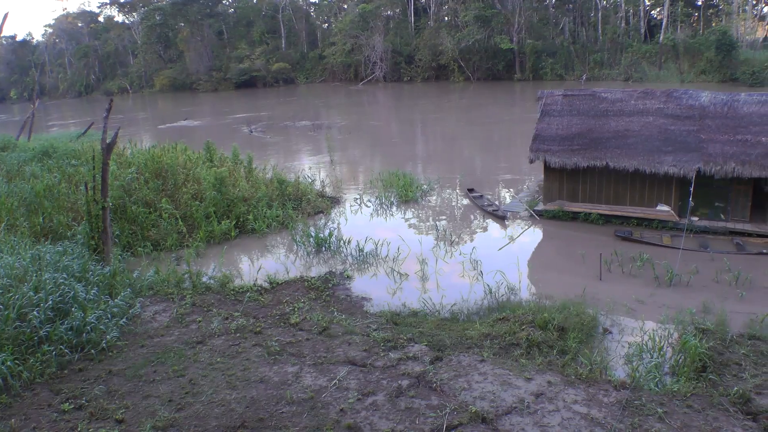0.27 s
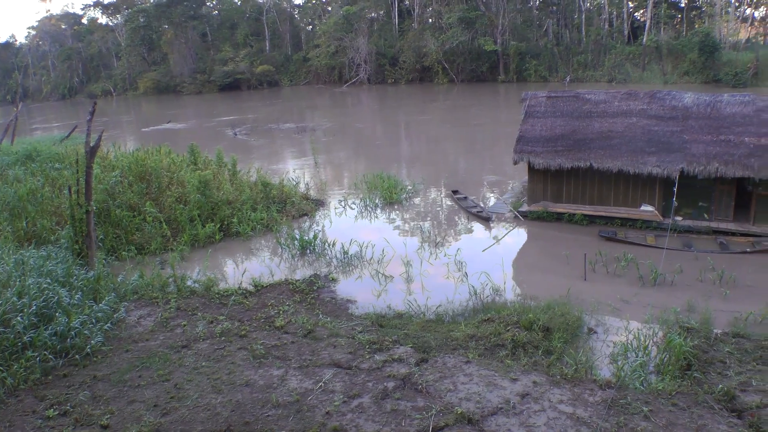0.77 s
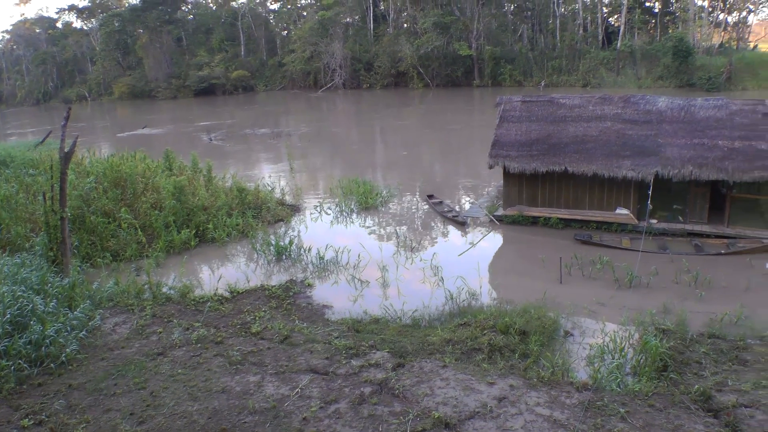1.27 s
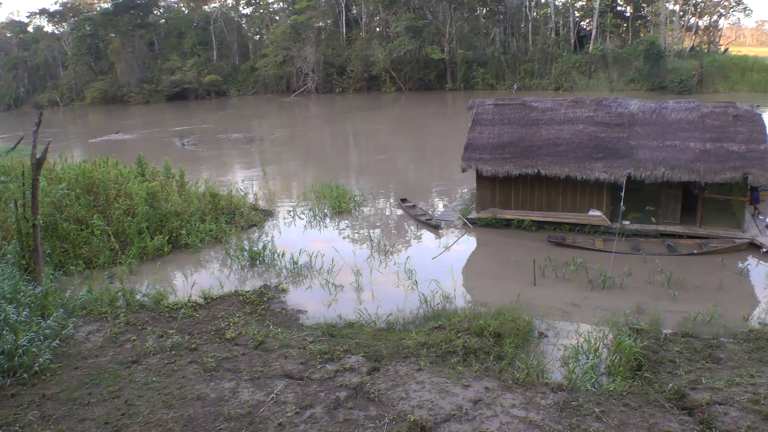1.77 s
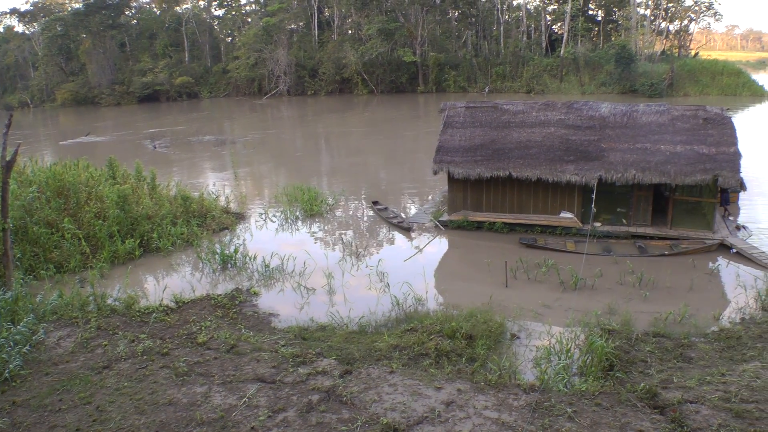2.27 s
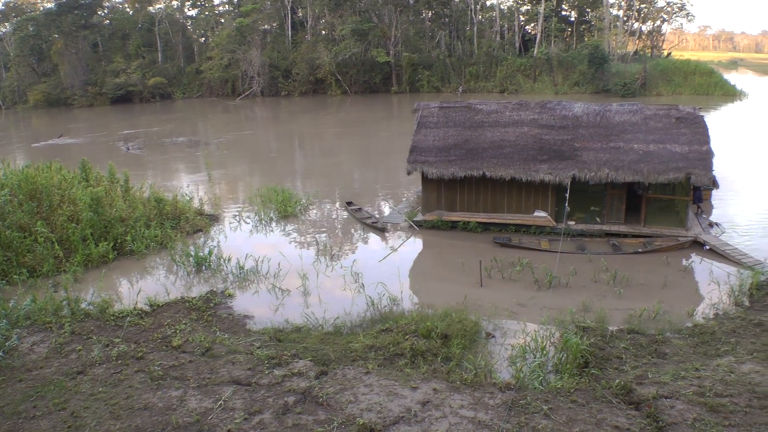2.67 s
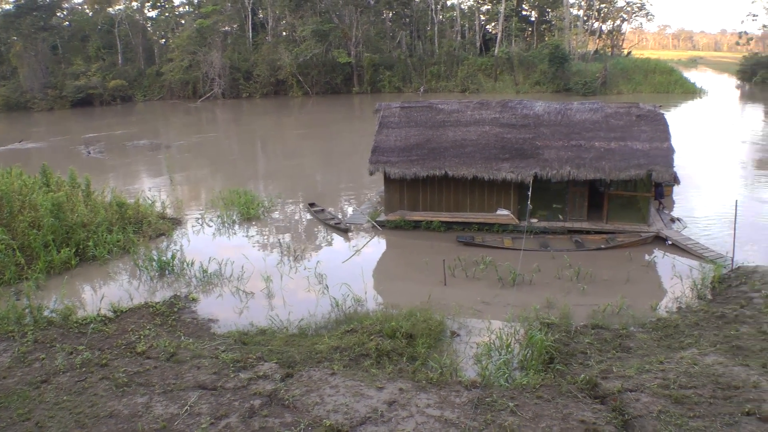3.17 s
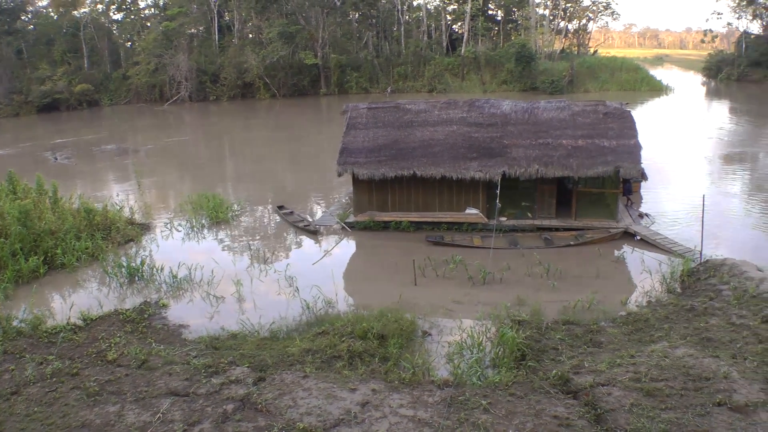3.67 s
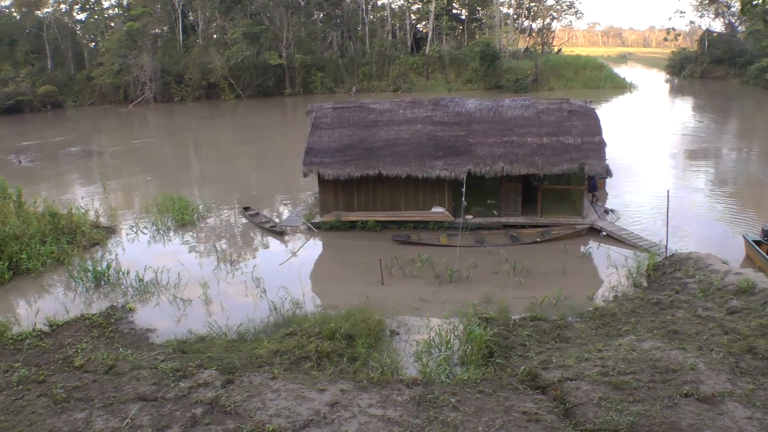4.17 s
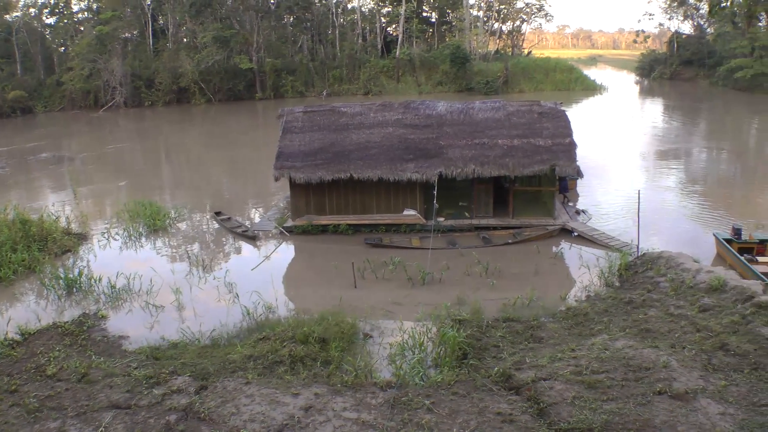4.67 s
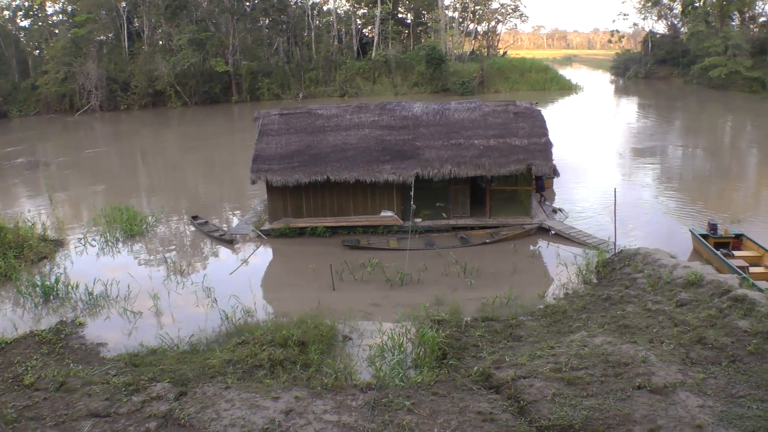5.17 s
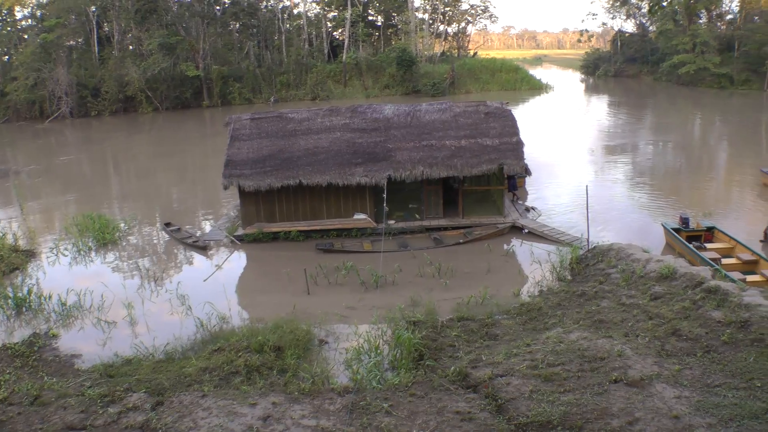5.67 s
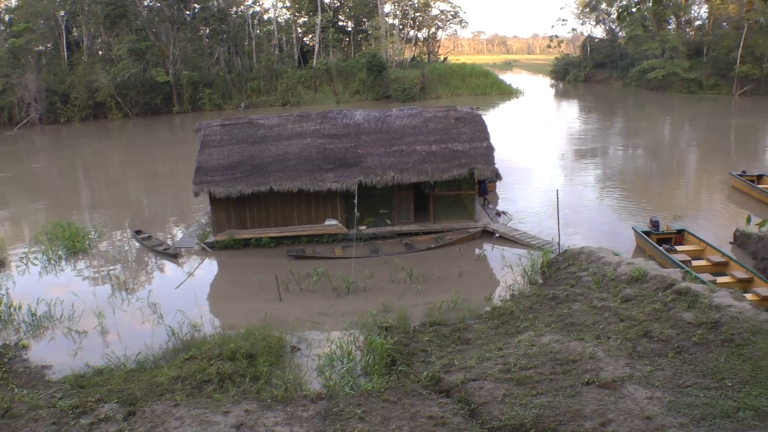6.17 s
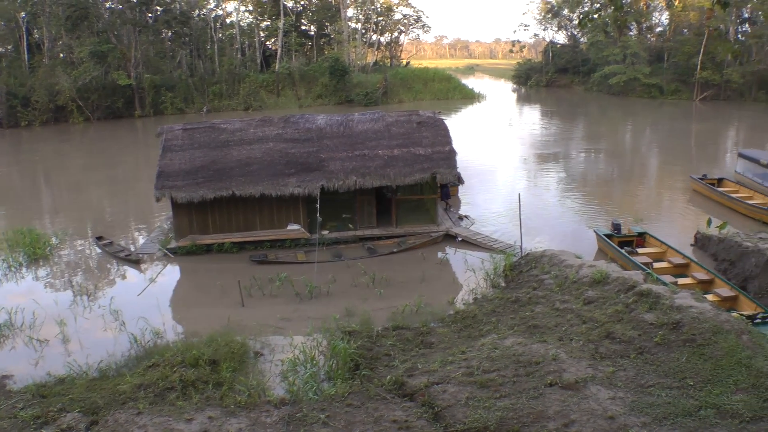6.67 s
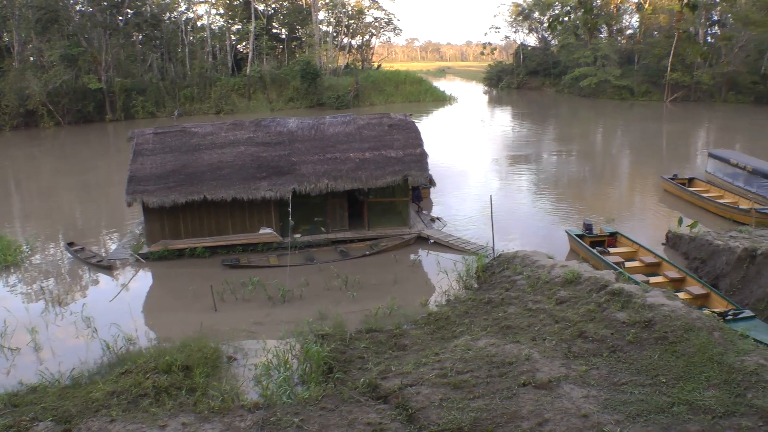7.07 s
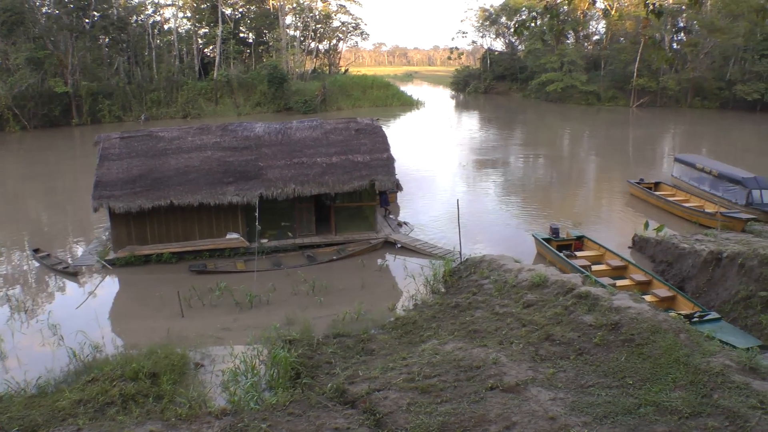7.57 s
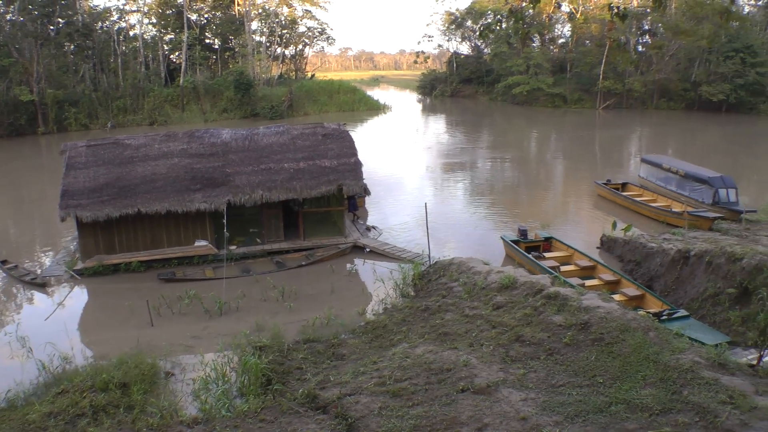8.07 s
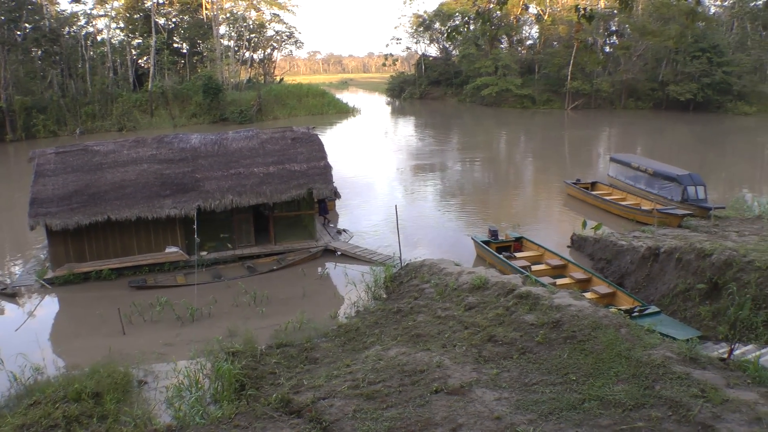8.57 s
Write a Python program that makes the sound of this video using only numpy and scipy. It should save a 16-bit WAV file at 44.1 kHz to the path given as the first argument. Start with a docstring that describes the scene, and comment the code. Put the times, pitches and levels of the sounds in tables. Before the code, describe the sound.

Nasal upflipping bird notes, harsh squawks, a quickening rattle, a piercing cry and rough scolding ring out beside a quiet wooded river.

```python
"""A close mimic bird pipes, whistles, trills, squawks, scolds and rasps on a forest river bank at dawn.
Its calls are overtone stacks shaped by throat and beak, and roughness scatters them into noise; the rasp
is a run of ringing clicks. Other birds add short gliding notes, and a soft tail of sparse echoes answers.
Far birds chirp as a haze of tiny glides, and two kinds of insect buzz high as throbbing bands of noise.
Beneath lie a low murmur of air and water, as coloured noise, and a puff of wind on the microphones."""
import sys
import numpy as np
from scipy import signal
from scipy.io import wavfile
from scipy.ndimage import uniform_filter1d

SR = 44100
rng = np.random.default_rng(int(sys.argv[2]) if len(sys.argv) > 2 else 0)


def magnitude_from_level(level_db):
    """Linear magnitude for a level in decibels (20 dB per decade)."""
    exponent = np.asarray(level_db, float) / 20
    return 10 ** exponent


def store_wav(level_fs):
    """Save 16-bit WAV to argv[1]."""
    pcm = np.round(np.clip(np.atleast_2d(level_fs), -1, 1) * 32767)
    wavfile.write(sys.argv[1], SR, pcm.T.astype(np.int16))


N = 388962

# long nasal notes that sag, then flip upward: start_s, flip_top_s, held_low_hz, effort_db
PIPED_NOTES = [(0.129, .462, 1130, -27), (0.59, 0.937, 1091, -26.5)]
# throat colour of the piped and sliding notes: frequency_hz, gain_db
PIPE_THROAT = [(1100, -26), (1750, -7.5), (2300, -7.5), (3400, -3.5), (4600, 1), (5800, -7), (9000, -20),
               (15000, -38.5)]
SAG, SAG_AT = .06, .44  # rise of pitch at the note's start, as a share; lowest point, as a share of the note
FLIP_S, FLIP_HZ, FLIP_DB = 0.011, 1773, 5.5  # time constant, pitch at the top, extra effort
RELEASE_S, RELEASE_DB = 0.029, -21  # after the top of the flip

# two-part whistles that drop onto one held pitch: start_s, end_s, effort_db
DROPPED_WHISTLES = [(2.139, 2.243, -33.5), (2.402, 2.525, -32)]
# throat colour of the dropping whistles: frequency_hz, gain_db
WHISTLE_THROAT = [(1400, -8), (2900, 0), (3700, -8), (5600, -18), (14000, -51)]
DROP_HZ, HELD_HZ, DROP_S = 1745, 1431, 0.025  # first pitch, held pitch, time between them
WHISTLE_ONSET_DB = -7.5  # effort at the start, against the end

# whistles that hold a pitch, then slide off: start_s, bend_s, end_s, held_hz, last_hz, effort_db
SLIDES = [(1.086, 1.119, 1.15, 2124, 1783, -29), (7.049, 7.091, 7.17, 3164, 1780, -34.5),
          (7.494, 7.543, 7.58, 3850, 3480, -33.5)]
SLIDE_EDGE_DB = -9  # effort at both ends, against the bend

# one rough high cry: start_s, peak_s, end_s, pitch_hz, effort_db
SHRIEK = (7.279, 7.316, 7.344, 3010, -20.5)
# contour of the long whistle after it: time_s, pitch_hz, effort_db
LONG_WHISTLE = [(7.34, 2016, -35), (7.38, 1904, -22), (7.42, 1784, -23), (7.487, 1800, -29.5),
                (7.505, 1897, -37.5), (7.57, 1845, -43)]
# throat colour of the shriek and the long whistle: frequency_hz, gain_db
SHRILL_THROAT = [(1900, 0), (3600, -19), (3850, -12), (5380, -5), (5680, -25), (7300, -19), (10000, -45)]

# notes chopped into throbs: start_s, end_s, first_hz, last_hz, effort_db
TRILLS = [(3.707, 3.802, 1315, 1204, -38), (3.951, 3.992, 1268, 1262, -39), (4.252, 4.388, 1268, 1163, -43),
          (6.398, 6.568, 2292, 2257, -42.5)]
# throat colour of the trills: frequency_hz, gain_db
TRILL_THROAT = [(1200, -0.5), (2500, 10.5), (5500, 8.5), (13000, -67)]
THROBS_PER_S = 62.9

# harsh calls on one arch of pitch and effort: start_s, peak_s, end_s, top_hz, effort_db, beak_hz
SQUAWKS = [(2.623, 2.687, 2.775, 873, -29.5, 3150), (3.06, 3.118, 3.145, 497, -25.5, 2700),
           (3.144, 3.2, 3.3, 579.3, -30, 2320), (3.392, 3.534, 3.62, 481.8, -25.5, 2460),
           (3.805, 3.853, 3.92, 476.5, -23, 2830), (3.993, 4.03, 4.11, 638.5, -27.5, 2620),
           (6.564, 6.621, 6.7, 640, -32, 1960)]
# throat colour of the squawks and scolds: frequency_hz, gain_db
SQUAWK_THROAT = [(1500, -13.5), (1700, 2.5), (3600, 8), (4200, 1), (5500, 2.5), (15000, -33)]
SCOOP, DROOP, SNAP_S = .64, .72, .026  # first and last pitch as shares of the top; time to scoop up
ONSET_DB, SNAPPED_DB, END_DB = -12, -3, -13.5  # effort at start, after the scoop and at the end
STRAIN, BEAK_DB = .55, 8  # roughness 0-1 set at full effort; lift of the beak resonance

# rough calls around one pitch: start_s, end_s, effort_db, beak_hz
SCOLDS = [(4.786, 4.866, -37, 4040), (5.061, 5.257, -36.5, 3650), (5.186, 5.596, -31, 3720),
          (5.434, 5.666, -35.5, 3480), (5.813, 5.969, -33.5, 3120), (8.448, 8.617, -28, 2870),
          (8.561, 8.897, -35, 3260)]
SCOLD_HZ, SCOLD_ROUGH, SCOLD_BEAK_DB = 1021, .74, 14  # pitch, roughness 0-1, lift of the beak resonance

TOP_HZ = 15500  # no overtones above this
GRAIN, GRAIN_HZ = .35, 130  # uneven pulsing of a rough voice: depth at full roughness, pace

# a rattle that speeds up into a rasp: time_s, clicks_per_s (centre of an uneven pace), effort_db
RASP = [(6.718, 50, -31), (6.76, 60, -33), (6.841, 550, -30.5), (6.949, 660, -30), (7, 570, -41)]
# throat resonances that the clicks ring: frequency_hz, width_hz (of each of two passes), level_db
RASP_THROAT = [(1000, 1000, -17), (3750, 900, 0), (4750, 550, -2), (6100, 1600, -5), (10000, 3000, -21)]

# series of one repeated note: (length_s, first_hz, last_hz, level_db), then a list of start_s
SERIES = [((.022, 3000, 1050, -35), [.228, .268, .305, .338]), ((.028, 5200, 5050, -35), [.25, .275, .305]),
          ((.05, 1520, 1420, -58), [7.67, 7.81, 7.94, 8.07, 8.19])]
# short single notes, mostly of other birds; the two near 0.48 s and 0.50 s are the falling end of the first
# piped note: start_s, length_s, first_hz, last_hz, level_db
SINGLE_NOTES = [(0.378, 0.07, 926, 935, -43.5), (0.477, 0.031, 1796, 1600, -29),
                (0.502, 0.045, 1698, 856, -43), (4.306, 0.052, 210, 204, -47.5),
                (4.961, 0.049, 430, 442, -50.5), (5.09, 0.023, 565, 466, -44),
                (5.501, 0.06, 908, 970, -44.5), (5.715, 0.0507, 4670, 4800, -44),
                (5.772, 0.039, 588, 590, -41), (5.968, .07, 5000, 780, -34), (6.035, .06, 800, 770, -46),
                (7.581, 0.49, 1877, 1792, -58.5), (8.052, 0.51, 3460, 3210, -57),
                (8.347, 0.11, 3980, 5950, -53)]
# bursts of quick glides at scattered pitches: start_s, end_s, middle_hz, level_db
TWITTERS = [(1.69, 1.858, 3730, -44)]
TWEET_S, TWEET_SPREAD = .022, .17  # length of a glide; scatter of pitch as a share
# a dry snap: start_s, level_db
SNAPS = [(2.352, -30)]

# echo decay among trunks and water: frequency_hz, t60_s
WOODS_DECAY = [(1500, .55), (6000, .36)]
# swell of the far birds: time_s, level_db
CHORUS_SWELL = [(0, -43.5), (2, -55), (6, -43), (8.2, -71)]
CHORUS_PER_S = 600  # average count of chirps, all pitches together

# insect crowds: band_hz, width_hz (of each of two passes), level_db, throbs_per_s, throb_depth 0-1
INSECTS = [(5827, 700, -45, 410, 0.2), (6873, 400, -48.5, 45, 0.21)]
# colour of the murmur of air and water: frequency_hz, relative density_db
AIR_COLOUR = [(25, -9.5), (260, -2.5), (500, -15), (730, -12.5), (1000, -28.5), (1500, -19.5), (4000, -9.5),
              (8500, -31), (15500, -34.5)]
AIR_DB = -49.5
# likeness of broad noise at the two microphones: frequency_hz, likeness 0-1
MIC_LIKENESS = [(30, 0.43), (400, 0.39), (3000, 0.8)]
# puffs of wind on the microphones: centre_s, half_length_s, level_db
GUSTS = [(0.643, 0.44, -46.5)]
RUMBLE_HZ = 83  # pace of the wind's rumble
START_S = .128  # silence before the sound opens


def evened(x):
    """Scales a signal to an rms of 1."""
    return x / np.sqrt(np.mean(abs(x) ** 2) + 1e-20)


def read(points, hz):
    """Reads a curve of (frequency_hz, value) points along a log pitch scale."""
    f, value = np.transpose(points)
    return np.interp(np.log(hz + 1), np.log(f + 1), value)


def add(mix, start_s, sound):
    """Lays a sound into the mix at its start, cut off at the end of the mix."""
    part = mix[round(start_s * SR):][:len(sound)]
    part += sound[:len(part)]


def wobble(count, hz):
    """Complex random motion of rms 1 that changes about hz times a second."""
    warm_up = 2000
    z = rng.standard_normal(count + warm_up) + 1j * rng.standard_normal(count + warm_up)
    r = np.exp(-2 * np.pi * hz / SR)
    return evened(signal.lfilter([1], [1, -2 * r, r * r], z)[warm_up:])


def resonate(x, hz, width):
    """One resonance, as a shift to zero, a smoothing and a shift back."""
    turn = np.exp(2j * np.pi * hz * np.arange(x.shape[-1]) / SR)
    r = np.exp(-np.pi * width / SR)
    return 2 * (turn * signal.lfilter([1 - r], [1, -r], x / turn)).real


def voice(rows, throat, rough, flutter=0.71, beak_hz=0, beak_db=0, edge_s=0.0041, blur_hz=420):
    """Overtones of the syrinx weighed by throat and beak; each flutters, and roughness scatters it into noise."""
    s, hz, effort_db = np.transpose(rows)
    t = np.arange(s[0], s[-1], 1 / SR)
    hz, effort_db = np.interp(t, s, hz), np.interp(t, s, effort_db)
    top_hz = hz.max()
    push = magnitude_from_level(effort_db - effort_db.max())
    roughness = np.clip(rough(hz, push), 0, 1)
    hz = hz * (1 + .07 * roughness * wobble(len(t), 25).real)  # a rough voice cannot hold its pitch

    k = np.arange(1, TOP_HZ // hz.min() + 1)[:, None]  # overtone numbers
    scatter = 1 - (1 - roughness) ** ((k * hz / 2600) ** 2)  # upper overtones scatter first
    # the beak closes as the pitch sinks, so it keeps to the same overtones
    lift_db = beak_db * np.exp(-((k * top_hz - beak_hz) / 600) ** 2)
    weight = magnitude_from_level(read(throat, k * hz) + lift_db) * (k * hz < TOP_HZ)
    weight /= np.sqrt((weight ** 2).sum(0) / 2)

    steady = 1 + flutter * np.array([wobble(len(t), 45) for _ in k])
    # fills the gaps between close overtones
    scattered = np.array([wobble(len(t), min(hz.mean() / 2, blur_hz)) for _ in k])
    envelopes = np.sqrt(1 - scatter) * steady + np.sqrt(scatter) * scattered
    tones = envelopes * np.exp(2j * np.pi * k * np.cumsum(hz) / SR)
    edge = np.clip(np.minimum(t - s[0], s[-1] - t) / edge_s, 0, 1)
    grain = 1 + GRAIN * scatter.mean(0) * wobble(len(t), GRAIN_HZ).real
    return s[0], magnitude_from_level(effort_db) * edge * grain * (weight * tones.real).sum(0)


def pipe_contour(start_s, top_s, low_hz, db):
    """Pitch and effort of one nasal note: a shallow sag, a steepening flip, a quick release."""
    t = np.linspace(start_s, top_s + RELEASE_S, num=200)
    flip = np.exp(np.minimum(t - top_s, 0) / FLIP_S)
    after = np.maximum(t - top_s, 0) / RELEASE_S
    progress = (t - start_s) / (top_s - start_s)
    held = low_hz * (1 + SAG * ((progress - SAG_AT) / SAG_AT) ** 2)
    hz = held + (FLIP_HZ - held) * flip
    return np.transpose([t, hz, db + FLIP_DB * flip + RELEASE_DB * after ** 2])


def piped_notes():
    """Nasal notes whose voice breaks into noise as it flips up."""
    for row in PIPED_NOTES:
        yield voice(pipe_contour(*row), PIPE_THROAT,
                    lambda hz, push: np.clip((hz - 1250) / 700, .02, .5), flutter=0.57, edge_s=0.0059)


def whistles():
    """Nearly pure voices: drops onto a held pitch, slides off one, and the long whistle."""
    for s, end_s, db in DROPPED_WHISTLES:
        rows = [(s, DROP_HZ, db + WHISTLE_ONSET_DB),
                (s + DROP_S, HELD_HZ, db + WHISTLE_ONSET_DB / 2),
                (end_s, HELD_HZ, db)]
        yield voice(rows, WHISTLE_THROAT, lambda hz, push: .02,
                    flutter=0.61, beak_hz=2 * DROP_HZ, beak_db=12.5)
    for s, bend_s, end_s, held_hz, last_hz, db in SLIDES:
        rows = [(s, held_hz, db + SLIDE_EDGE_DB), (bend_s, held_hz, db), (end_s, last_hz, db + SLIDE_EDGE_DB)]
        yield voice(rows, PIPE_THROAT, lambda hz, push: .12, flutter=0.42)
    yield voice(LONG_WHISTLE, SHRILL_THROAT, lambda hz, push: .01, flutter=0.57)


def shriek():
    """One high voice, half rough, swelling to a peak and falling off."""
    s, peak_s, end_s, hz, db = SHRIEK
    rows = [(s, hz, db - 18), (peak_s, hz, db), (end_s, hz, db - 12)]
    yield voice(rows, SHRILL_THROAT, lambda hz, push: .5)


def trills():
    """Gliding voices chopped by a deep, regular swing of level."""
    for s, end_s, first_hz, last_hz, db in TRILLS:
        s, tone = voice([(s, first_hz, db), (end_s, last_hz, db)], TRILL_THROAT,
                        lambda hz, push: .08, flutter=0.51, edge_s=0.00067)
        t = np.arange(len(tone)) / SR
        yield s, tone * (1 - 0.86 * np.cos(2 * np.pi * THROBS_PER_S * t))


def squawks():
    """Arched voices, clear at both ends and rough while pushed hard."""
    for s, peak_s, end_s, hz, db, beak_hz in SQUAWKS:
        rows = [(s, SCOOP * hz, db + ONSET_DB), (s + SNAP_S, .96 * hz, db + SNAPPED_DB),
                (peak_s, hz, db), (end_s, DROOP * hz, db + END_DB)]
        yield voice(rows, SQUAWK_THROAT, lambda hz, push: STRAIN * push ** 2,
                    flutter=0.56, beak_hz=beak_hz, beak_db=BEAK_DB, edge_s=0.0014)


def scolds():
    """Voices rougher than squawks from start to end, the overtones blurred into bands."""
    for s, end_s, db, beak_hz in SCOLDS:
        rows = [(s, SCOLD_HZ, db - 8), ((2 * s + end_s) / 3, SCOLD_HZ, db), (end_s, SCOLD_HZ, db - 3.5)]
        yield voice(rows, SQUAWK_THROAT, lambda hz, push: SCOLD_ROUGH,
                    beak_hz=beak_hz, beak_db=SCOLD_BEAK_DB, edge_s=0.016, blur_hz=SCOLD_HZ / 3)


def rasp():
    """Uneven clicks of uneven size ring the throat."""
    s, rate, effort_db = np.transpose(RASP)
    t = np.arange(s[0], s[-1], 1 / SR)
    rate = np.interp(t, s, rate)
    turns = np.cumsum(rate * abs(1 + 0.27 * wobble(len(t), 150))) / SR
    clicks = np.diff(np.floor(turns), prepend=-1) * magnitude_from_level(1.5 * rng.standard_normal(len(t)))
    # each click is a short burst of noise
    drive = signal.lfilter([1], [1, -.985], clicks) * rng.standard_normal(len(t))
    ring = sum(magnitude_from_level(db) * evened(resonate(resonate(drive, f, w), f, w)) for f, w, db in RASP_THROAT)
    # dividing by the root of the pace keeps crowded clicks from growing louder
    return s[0], magnitude_from_level(np.interp(t, s, effort_db)) * evened(ring / np.sqrt(rate))


def note(start_s, length_s, first_hz, last_hz, db):
    """A husky sine glide, quick at first, its level shaken at random."""
    u = np.arange(0, 1, 1 / (length_s * SR))
    hz = first_hz * (last_hz / first_hz) ** (u ** .65)
    husk = 1 + .9 * wobble(len(u), 150).real
    edge = signal.windows.tukey(len(u), .3)
    return start_s, magnitude_from_level(db) * husk * edge * np.sin(2 * np.pi * np.cumsum(hz) / SR)


def short_notes():
    """Repeated and single notes, each one husky glide."""
    for shape, starts in SERIES:
        for s in starts:
            yield note(s, *shape)
    for row in SINGLE_NOTES:
        yield note(*row)


def twitters():
    """Overlapping quick glides with random pitch, slope and level."""
    for s, end_s, hz, db in TWITTERS:
        for at in np.arange(s, end_s, TWEET_S / 4):
            first, slope, size = rng.standard_normal(3)
            first_hz = hz * (1 + TWEET_SPREAD * first)
            last_hz = hz * (1 + TWEET_SPREAD * (first + slope / 2))
            yield note(at, TWEET_S, first_hz, last_hz, db + 3 * size)


def snaps():
    """Dry snaps: a few milliseconds of dying noise."""
    for s, db in SNAPS:
        decay = np.exp(-np.arange(200) / 24)
        yield s, magnitude_from_level(db) * wobble(200, 5900).real * decay


def birds():
    """Every call that stands out, and the snap, before the woods answer."""
    mix = np.zeros(N)
    for calls in (piped_notes(), whistles(), shriek(), trills(), squawks(), scolds()):
        for call in calls:
            add(mix, *call)
    # a small throat carries no bass
    mix = signal.sosfilt(signal.butter(4, 1000, "highpass", fs=SR, output="sos"), mix)
    for sounds in (short_notes(), twitters(), snaps()):
        for sound in sounds:
            add(mix, *sound)
    add(mix, *rasp())
    return mix


def woods(x):
    """Sparse echoes of random sign off trunks and water, the treble dying first."""
    taps = np.zeros((2, SR))
    at = np.arange(300, SR - 20, 20) + rng.integers(0, 20, (2, (SR - 301) // 20))
    np.put_along_axis(taps, at, rng.choice([-1., 1.], at.shape), 1)
    taps[1] = 0.72 * taps[0] + 0.58 * taps[1]  # the two sides are partly alike
    hz, t, z = signal.stft(taps, SR, nperseg=256)
    decay = magnitude_from_level(-60 * t / read(WOODS_DECAY, hz)[:, None])
    tail = signal.istft(z * decay, SR, nperseg=256)[1]
    return signal.fftconvolve(x[None], tail / np.linalg.norm(tail[0]), axes=1)[:, :N]


def chorus():
    """Far birds: hundreds of tiny glides a second at scattered pitches."""
    out, u = np.zeros(N), np.linspace(0, 1, num=1000)
    for hz in np.geomspace(1800, 5000, num=40):
        turns = np.cumsum(hz * (1 + .12 * rng.standard_normal() * (u - .5))) / SR
        chirp = np.sin(np.pi * u) * np.sin(2 * np.pi * turns)
        starts = rng.random(N) < CHORUS_PER_S / 40 / SR
        sizes = magnitude_from_level(2.5 * rng.exponential(1, N))
        out += signal.oaconvolve(starts * sizes, chirp)[:N]
    return evened(out) * magnitude_from_level(np.interp(np.arange(N) / SR, *np.transpose(CHORUS_SWELL)))


def rfft_hz():
    """Frequencies of the noise painter's bins."""
    return np.fft.rfftfreq(1024, 1 / SR)


def pair(spectrum_db):
    """Noise of a given colour, partly alike at the two microphones, in drifting patches."""
    a, b, c, d, patches = rng.standard_normal((N // 256 + 5, 513, 5)).T
    patches = uniform_filter1d(patches, size=12, axis=0)  # across frequency
    patches = evened(uniform_filter1d(patches, size=14, axis=1))  # along time
    same = np.clip(read(MIC_LIKENESS, rfft_hz()), -1, 1)[:, None]
    left, other = a + 1j * b, c + 1j * d
    z = np.array([left, same * left + np.sqrt(1 - same ** 2) * other])
    z *= magnitude_from_level(spectrum_db[:, None] + patches)
    return evened(signal.istft(z, nperseg=1024, noverlap=768)[1][:, :N])


def insects():
    """Crowds of wings and membranes: noise in one resonance each, throbbing at the stroke rate."""
    out, t = np.zeros((2, N)), np.arange(N) / SR
    drive = pair(0 * rfft_hz())
    for hz, width, db, rate, depth in INSECTS:
        band = evened(resonate(resonate(drive, hz, width), hz, width))
        throb = 1 + depth * np.cos(2 * np.pi * rate * t + .5 * wobble(N, 0.72).real)
        drift_db = 2.26 * wobble(N, 0.68).real
        out += magnitude_from_level(db + drift_db) * throb * band
    return out


def murmur():
    """Air and water: a bed of noise coloured toward the bass."""
    return magnitude_from_level(AIR_DB) * pair(read(AIR_COLOUR, rfft_hz()))


def wind():
    """Low rumble, unrelated at the two microphones, rising in gusts."""
    t = np.arange(N) / SR
    level = sum(magnitude_from_level(db) * np.exp(-((t - s) / half) ** 2) for s, half, db in GUSTS)
    return level * evened(np.array([wobble(N, RUMBLE_HZ).real, wobble(N, RUMBLE_HZ).real]))


def scene():
    """Near calls over their echoes and the background, both leaning to the right."""
    near = birds()
    far = magnitude_from_level(-4) * woods(near) + woods(chorus()) + insects() + murmur() + wind()
    return near * magnitude_from_level(np.array([[-1.4], [1.4]])) + far * magnitude_from_level(np.array([[-1.1], [1.1]]))


def band_limit(x):
    """A steep low-pass at the top of the band."""
    return signal.sosfilt(signal.butter(12, 15960, fs=SR, output="sos"), x)


def record(dry):
    """The sound opens abruptly after a short silence."""
    opening = np.clip((np.arange(N) / SR - START_S) / 0.0026, 0, 1)
    return band_limit(dry * opening)


dry = scene()
out = record(dry)
store_wav(out)
```